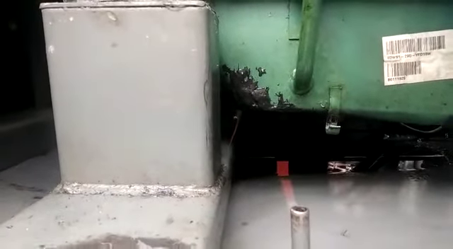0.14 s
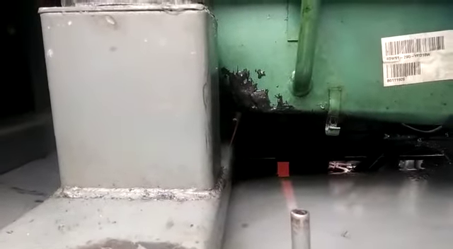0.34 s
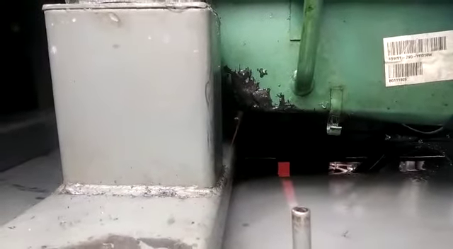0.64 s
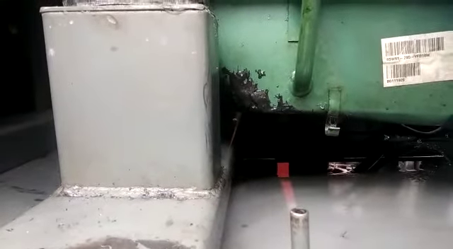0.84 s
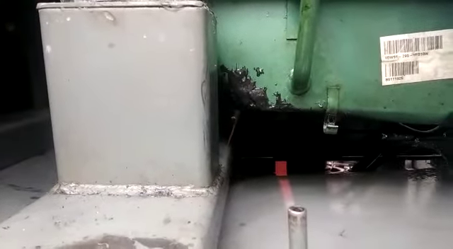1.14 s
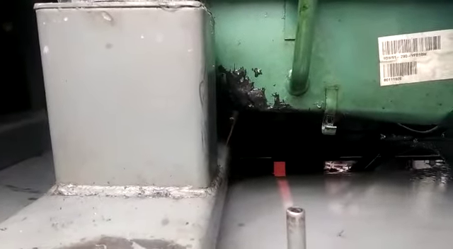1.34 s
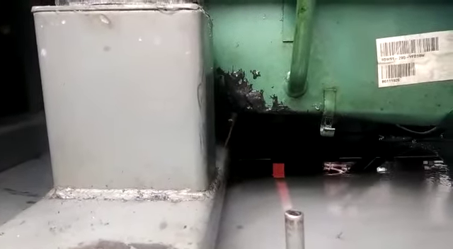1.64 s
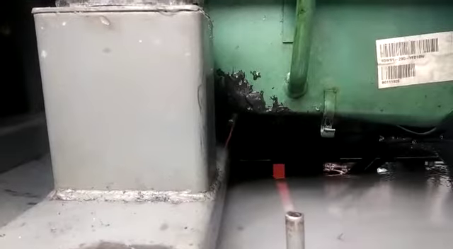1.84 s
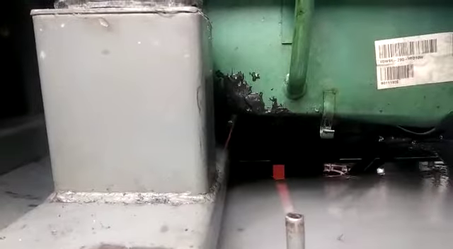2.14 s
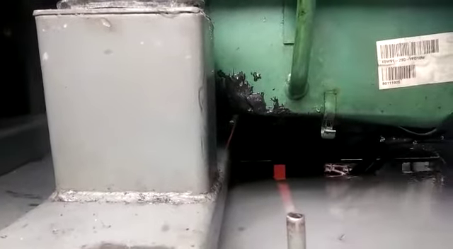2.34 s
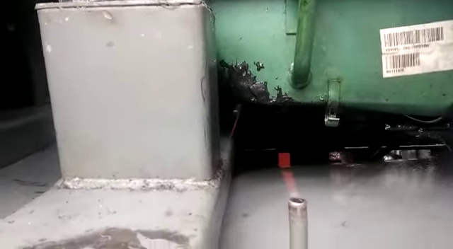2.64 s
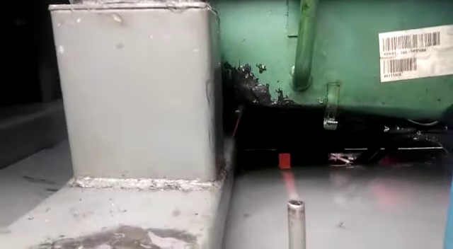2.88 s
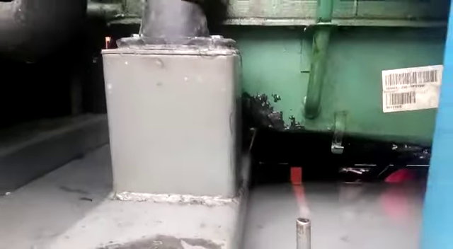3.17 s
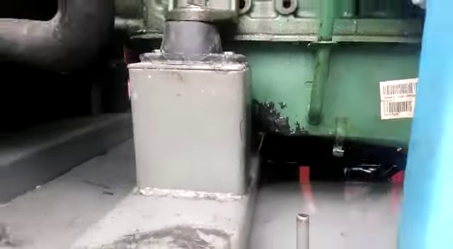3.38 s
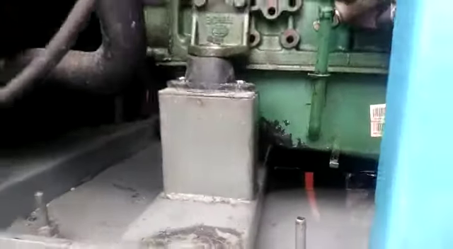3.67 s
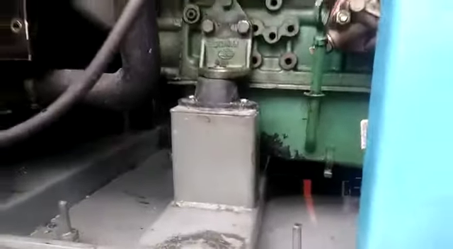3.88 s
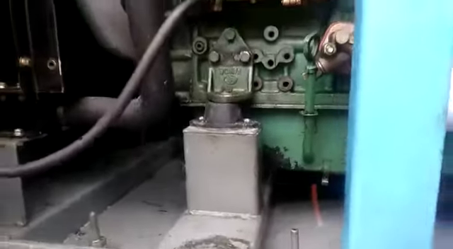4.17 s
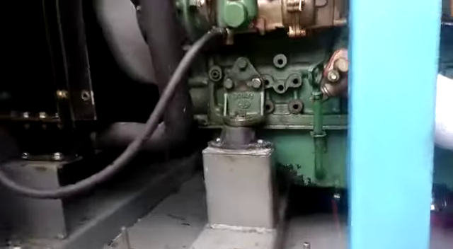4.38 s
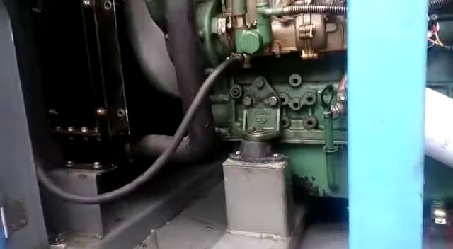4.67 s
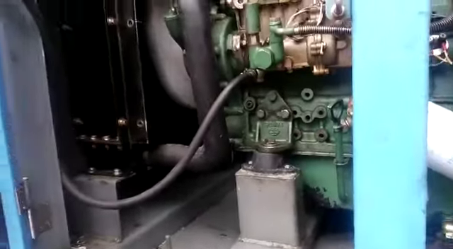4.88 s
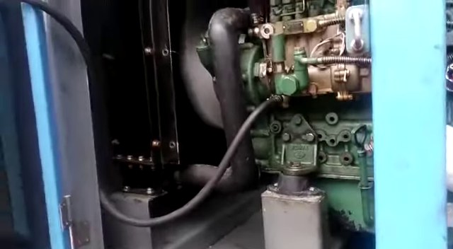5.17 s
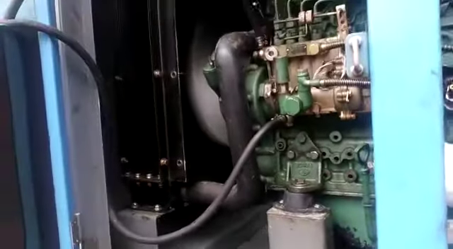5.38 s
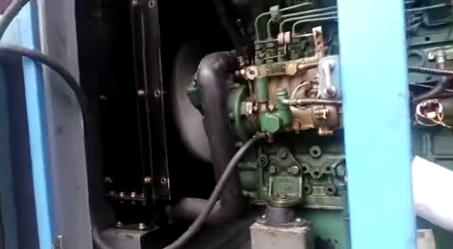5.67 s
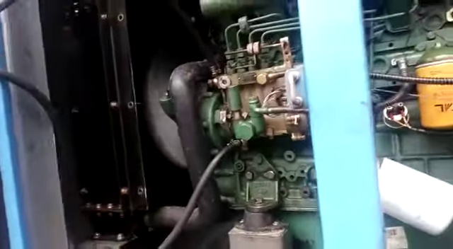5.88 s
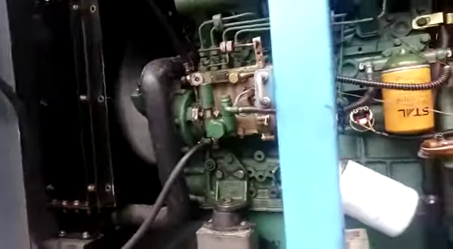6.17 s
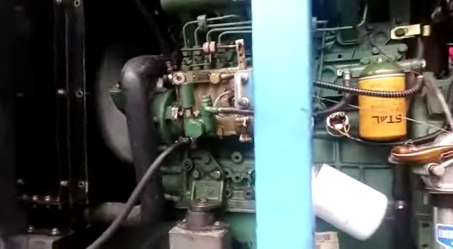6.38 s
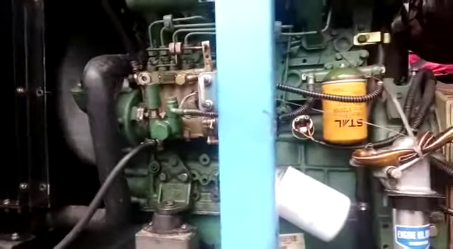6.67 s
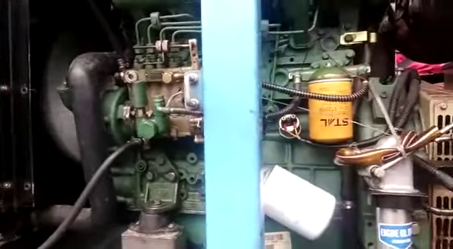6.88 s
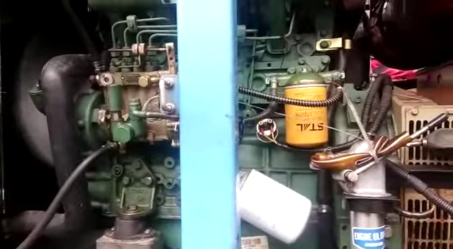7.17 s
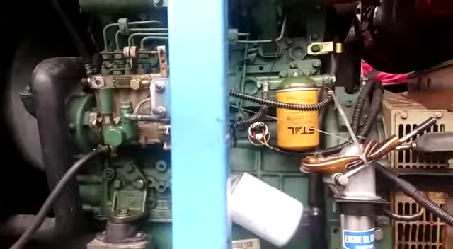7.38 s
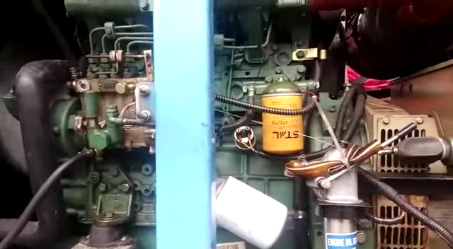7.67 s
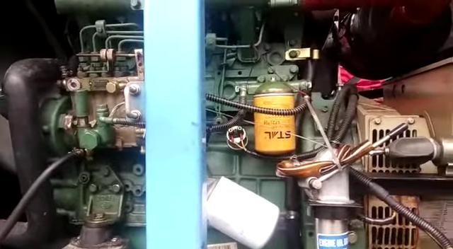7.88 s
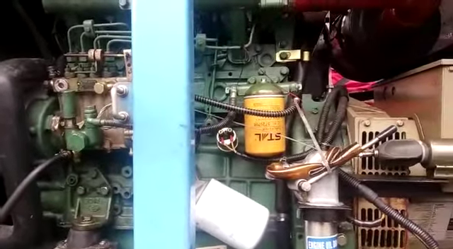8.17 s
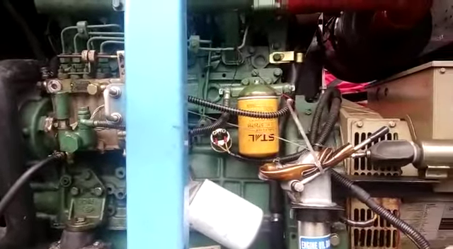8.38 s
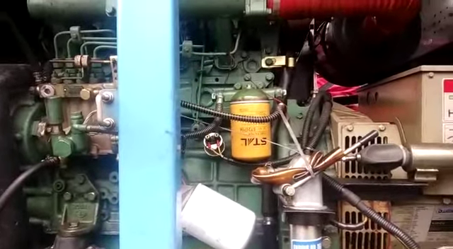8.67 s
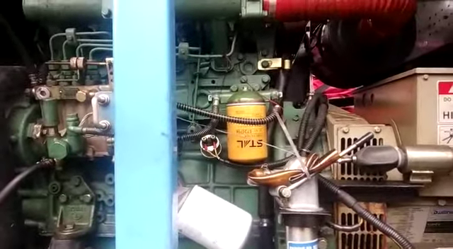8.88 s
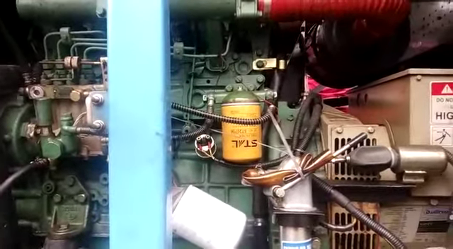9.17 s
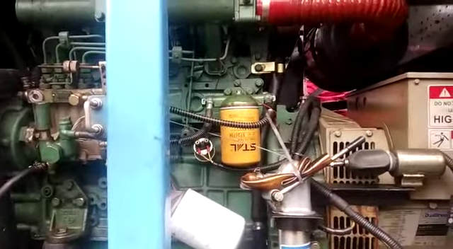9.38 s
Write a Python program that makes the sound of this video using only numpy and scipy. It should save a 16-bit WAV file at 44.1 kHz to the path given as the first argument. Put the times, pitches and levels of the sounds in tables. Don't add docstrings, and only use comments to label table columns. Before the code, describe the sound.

A four-cylinder diesel generator is already running and never changes speed. A low hum near 53 Hz and its octave sit under rapid hard knocks, about fifty-three a second, with rasping valve clatter and rushing air. A phone starts low beside the sump, then backs past the door frame from about three to six seconds; the knock thins and the clatter grows brighter.

```python
import sys
import numpy as np
from scipy import signal
from scipy.io import wavfile
from scipy.ndimage import uniform_filter1d

SR = 44100
rng = np.random.default_rng(int(sys.argv[2]) if len(sys.argv) > 2 else 0)


def volts_from_decibels(level):
    exponent = np.asarray(level, float) / 20
    return 10 ** exponent


def store_pcm(level_fs):
    pcm = np.round(np.clip(level_fs, -1, 1) * 32767).astype(np.int16)
    wavfile.write(sys.argv[1], SR, np.atleast_2d(pcm).T)


N = 420273

# time in s, distance as a share (0 by the sump, 1 standing back).
STANCE = [
    (0, 0),
    (2.6, 0.0009),
    (3.4, 0.16),
    (4.2, 0.37),
    (5.0, 0.59),
    (5.8, 0.71),
    (6.4, 0.95),
    (9.53, 1),
]
BURST_AT = .37
LEFT_RIGHT = np.array([[1], [-1]])


def in_time(rows):
    s, *columns = np.transpose(rows)
    return [np.interp(np.arange(N) / SR, s, c) for c in columns]


def at_hz(points, hz):
    f, *columns = np.transpose(points)
    return np.squeeze([np.interp(np.log(hz), np.log(f), c) for c in columns])


def drift(rate_hz):
    pole = np.exp(-80 * np.pi * rate_hz / SR)
    noise = rng.standard_normal(N // 40 + 2002)
    slow = signal.lfilter([1], [1, -2 * pole, pole * pole], noise)[2000:]
    return np.interp(np.arange(N) / 40, np.arange(len(slow)), slow / slow.std())


def blend(near, far, away):
    return near + (far - near) * away


def panned(hz, away):
    # frequency in Hz, level difference in dB; by the sump, then standing back.
    balance_near = [(60, 1.5), (110, 2), (200, 1), (380, -2.5), (700, 1.5), (1290, -2.5), (2380, 5.5),
                    (4400, 1.5), (8120, -2), (15000, -8)]
    balance_far = [(60, 1.5), (110, 1), (200, 4.5), (380, 0), (700, 1), (1290, -1.5), (2380, 7.5),
                   (4400, 0.5), (8120, -1), (15000, -10)]
    half_db = blend(at_hz(balance_near, hz), at_hz(balance_far, hz), away) / 2
    return volts_from_decibels(np.array([half_db, -half_db]))


def stereo(mid, side, hz, away):
    # frequency in Hz, correlation by the sump, correlation standing back.
    likeness = [(60, .99, .99), (110, .99, .99), (200, 0.01, 0.65), (380, 0.96, 0.94), (710, 0.72, 0.81),
                (1290, 0.43, 0.23), (2380, 0.053, 0), (15000, 0, 0.16)]
    alike = np.clip(blend(*at_hz(likeness, hz), away), 0, 1)
    return np.sqrt((1 + alike) / 2) * mid + np.sqrt((1 - alike) / 2) * side * LEFT_RIGHT


def hum(cycle, away):
    # multiple of the cycle, level by the sump in dB, level standing back in dB.
    orders = [(2, -49, -55), (3, -59, -54), (4, -15, -16), (5, -40, -43), (6, -57, -61), (7, -35, -41),
              (8, -16, -20), (9, -32.5, -35), (10, -40, -40.5), (11, -37, -34), (12, -31.5, -48.5),
              (13, -26.5, -42.5), (14, -34.5, -41.5), (15, -46, -46.5), (15.93, -30.5, -49),
              (16.92, -42, -41), (17.6, -67, -62), (18.83, -42, -59), (20.13, -47.5, -38), (21, -44, -44),
              (21.7, -46.5, -65)]
    octave_lead_rad = 1.85
    boom_order, boom_slope_rad = 10.3, 1.9
    waver_db = 0.2
    tone_db = blend(-14, -15.5, away) + waver_db * drift(1.5)
    octave_db = blend(-15, -20.0, away) + waver_db * drift(1.5)
    turn = 2 * np.pi * cycle
    out = volts_from_decibels(tone_db) * np.cos(4 * turn) * panned(53, away)
    out += volts_from_decibels(octave_db) * np.cos(8 * turn + octave_lead_rad) * panned(106, away)
    for order, near_db, far_db in orders:
        if order not in (4, 8):
            lead_rad = octave_lead_rad - boom_slope_rad * max(order - boom_order, 0)
            level = volts_from_decibels(blend(near_db, far_db, away) + .7 * drift(2.5))
            out += level * np.cos(order * turn + lead_rad) * panned(order * 13, away)
    return np.sqrt(2) * out


def knock(cycle, away, scatter=.35):
    # frequency in Hz, level by the sump in dB, level standing back in dB, t60 in s.
    modes = [(330.5, -30, -30.5, 0.15), (393, -39.5, -36, 0.12), (501.4, -29.5, -30, 0.061),
             (563, -29.5, -31, 0.097), (639.5, -25, -30.5, 0.079), (698.6, -23, -31, 0.076),
             (771.3, -26.5, -31, 0.079), (900, -29.5, -33.5, 0.068), (995, -27, -29.5, .06),
             (1052, -25.5, -31.5, 0.06), (1213, -22.5, -37, 0.049), (1294, -21, -37, 0.029),
             (1436, -28.5, -27, 0.095), (1555, -23, -26.5, 0.072), (1624, -21.5, -23, 0.079),
             (1770, -18, -32, 0.042), (2017, -27, -33.5, 0.072), (2252, -22, -21, 0.036),
             (2600, -34.5, -27.5, 0.056), (3004, -20, -18.5, 0.027), (3590, -29, -44, .03),
             (4400, -43, -57, 0.018)]
    firing = np.floor(4 * cycle - BURST_AT + .1).astype(int)
    at = np.flatnonzero(np.diff(firing)) + 1
    cylinder = firing[at] % 4
    there = away[at]
    turn = there * np.pi / 2
    out = 0
    for hz, near_db, far_db, t60_s in modes:
        near, far = rng.choice([-1, 1], (2, 2, 4)) * rng.uniform(.5, 1.5, (2, 2, 4))
        strike = np.cos(turn) * near[:, cylinder] + np.sin(turn) * far[:, cylinder]
        strike += scatter * rng.standard_normal(strike.shape)
        level = volts_from_decibels(blend(near_db, far_db, there)) * panned(hz, there)
        clicks = np.full((2, N), 1e-18)
        clicks[:, at] = stereo(*strike, hz, there) * level
        r, w = volts_from_decibels(-60 / (t60_s * SR)), 2 * np.pi * hz / SR
        out = out + signal.lfilter([0, np.sin(w)], [1, -2 * r * np.cos(w), r * r], clicks)
    return out


def bursts(cycle, sharp=1.6, scatter=.12):
    strength = [1.04, 0.81, 1.19, 1.09]
    beat = 4 * cycle - BURST_AT + .5
    firing = np.floor(beat).astype(int)
    size = np.array(strength)[firing % 4] * (1 + scatter * rng.standard_normal(N)[firing])
    swell = size * np.sin(np.pi * (beat % 1)) ** (2 * sharp)
    return swell - swell.mean()


def rush(edges, near, far, away, swell, patchy_db, treble_db=0):
    # frequency in Hz, then left near, right near, left far, right far in dB.
    depths = [(300, -2.5, 1, 4, .5), (1500, 3.5, 4.5, 1.5, 1), (4000, 3, 1.5, 3.5, 0.5),
              (7950, 6, 3, 0.5, 7), (14000, -3, 5.5, 7, 7)]
    out, together, white = 0, drift(12), rng.standard_normal((2, 2, N))
    for k, (low, high) in enumerate(zip(edges, edges[1:])):
        band = signal.butter(2, [low, high], "band", fs=SR, output="sos")
        mid, side = signal.sosfilt(band, white[k % 2])
        hz = np.sqrt(low * high)
        left_near, right_near, left_far, right_far = at_hz(depths, hz)
        depth_db = np.array([blend(left_near, left_far, away), blend(right_near, right_far, away)])
        db = blend(at_hz(near, hz), at_hz(far, hz), away)
        db = db + patchy_db * (0.21 * together + drift(11.6))
        turned_db = np.clip(np.log2(hz / 8000), 0, 1) * treble_db / 2
        level = volts_from_decibels(db + depth_db * swell + turned_db * LEFT_RIGHT)
        out = out + level * panned(hz, away) * stereo(mid, side, hz, away)
    power = np.mean(out ** 2, axis=0)
    return out / np.sqrt(blend(power[away < .1].mean(), power[away > .9].mean(), away))


def body_rush(away, swell):
    # frequency in Hz, density in dB per Hz; by the sump, then standing back.
    body_near = [(25, 0), (60, -2), (95, 6.5), (200, 9), (300, -6), (400, -1), (700, 0), (950, -1),
                 (1300, 4.5)]
    body_far = [(25, 5), (60, 4), (110, 6), (200, 3.5), (320, -4), (480, 0), (700, 3), (1000, 0.5),
                (1300, 7.5)]
    noise = rush(np.geomspace(22, 1300, 15), body_near, body_far, away, swell, patchy_db=.6)
    return volts_from_decibels(-23 + blend(0.018, -3.0, away)) * noise


def clatter(away, swell, turn_db):
    # frequency in Hz, density in dB per Hz; by the sump, then standing back.
    clatter_near = [(760, -34), (1300, -4), (1400, -12.5), (1520, -3.5), (2190, -4), (2560, -3.5),
                    (2760, -3), (2910, -4), (3940, -5.5), (5110, -6.5), (5670, -13), (6230, -7.5),
                    (8270, -9.5), (12000, -11), (15800, -15)]
    clatter_far = [(760, -39), (1300, -8.5), (1640, 1), (1720, -2.5), (2790, -1), (3400, -3), (3770, -2.5),
                   (4150, -6), (4650, -3), (5270, -6), (8090, -1), (9770, -4), (10500, -7), (11300, -5),
                   (15800, -10.5)]
    edges = np.geomspace(1300, 16500, 25)
    noise = rush(edges, clatter_near, clatter_far, away, swell, patchy_db=.6, treble_db=-turn_db)
    shade_db = -0.47 * np.sin(np.pi * away)
    return volts_from_decibels(blend(-18, -16.5, away) + shade_db + 3.0) * noise


def fan(cycle, away):
    # multiple of the blade rate, level by the sump in dB, level standing back in dB.
    harmonics = [(1, -30.5, -31.5), (2, -37.5, -37.5), (3, -36.5, -42)]
    blades_per_cycle = 17.915
    blades = 2 * np.pi * blades_per_cycle * cycle + 0.29 * drift(1.64)
    out = 0
    for k, near_db, far_db in harmonics:
        out = out + volts_from_decibels(blend(near_db, far_db, away) + 0.67 * drift(3.7)) * np.sin(k * blades)
    return np.sqrt(2) * out * panned(220, away)


def gears(cycle, away):
    # multiple of the cycle, level by the sump in dB, level standing back in dB.
    meshes = [(30, -46, -41.5), (48.07, -44.5, -42.5), (68, -54, -46.5), (75.2, -46, -38.5),
              (77, -39.5, -38), (80.6, -48, -57), (107.7, -45, -51), (120.4, -55, -39.5)]
    out = 0
    for order, near_db, far_db in meshes:
        level = volts_from_decibels(blend(near_db, far_db, away) + .8 * drift(3.5))
        phase = 2 * np.pi * order * cycle + .25 * drift(2.5)
        out = out + level * np.sin(phase) * panned(order * 13, away)
    return np.sqrt(2) * out


def door_frame(x, away):
    band = signal.sosfilt(signal.butter(1, [300, 2000], "band", fs=SR, output="sos"), x)
    late = np.arange(N) - blend(.0025, .0017, away) * SR
    share = .7 * np.sin(np.pi * away ** 0.71) ** 2
    return share * np.array([np.interp(late, np.arange(N), v) for v in band])


def thin_out(x):
    # frequency in Hz, threshold in dB against the broad spectrum.
    drops = [(1500, -25), (2500, -6.5), (3500, -1.5), (5500, 0), (7400, -1), (10000, -.5), (12000, -3),
             (15500, -3)]
    # centre in Hz, width in Hz, added threshold by the sump and standing back in dB.
    hollows = [(4150, 130, 0, 6), (5450, 200, 4, 5), (6250, 130, 1, 5), (8500, 250, 3, 1),
               (10400, 250, 2, 4)]
    patch_db = 5.0

    def broad(v):
        power = uniform_filter1d(np.abs(v) ** 2, size=5, axis=2)
        return np.sqrt(np.abs(uniform_filter1d(power, size=91, axis=1)) + 1e-16)

    mid_side = np.array([x[0] + x[1], x[0] - x[1]]) / 2
    hz, s, lines = signal.stft(mid_side, SR, window="cosine", nperseg=2048)
    chance = rng.standard_normal(lines.shape) * .6 + rng.standard_normal(lines.shape[1:]) * .8
    patch = uniform_filter1d(uniform_filter1d(chance, size=11, axis=1), size=2, axis=2)
    level, away = broad(lines), np.interp(s, *np.transpose(STANCE))
    threshold_db = at_hz(drops, hz + 1)[:, None] + patch_db * patch / patch.std()
    for mid_hz, wide_hz, near_db, far_db in hollows:
        shape = np.exp(-((hz - mid_hz) / wide_hz) ** 2)
        threshold_db = threshold_db + np.outer(shape, blend(near_db, far_db, away))
    kept = lines * (np.abs(lines) > level * volts_from_decibels(threshold_db))
    kept = kept * np.minimum(level / broad(kept), 2)
    mid, side = signal.istft(kept, SR, window="cosine", nperseg=2048)[1][:, :N]
    return np.array([mid + side, mid - side])


def scene():
    # time in s, four-stroke cycles per s.
    speed = [(0, 13.232), (.55, 13.234), (1.05, 13.22), (1.55, 13.238), (2.05, 13.21), (2.55, 13.208),
             (3.05, 13.227), (3.55, 13.217), (4.05, 13.194), (4.55, 13.214), (5.05, 13.222), (5.55, 13.24),
             (6.05, 13.221), (6.55, 13.23), (7.05, 13.205), (7.55, 13.205), (8.05, 13.223), (9.53, 13.223)]
    # time in s, lean of the top octave to the right in dB.
    hand_turn = [
        (0, -1),
        (3.2, -1.5),
        (4.7, -1.5),
        (5.1, 4),
        (6.2, 3),
        (7.2, 3.5),
        (8.6, 1.5),
        (9.53, 1),
    ]
    cycle = .0715 + np.cumsum(in_time(speed)[0]) / SR
    away = np.clip(in_time(STANCE)[0], 0, 1)
    turn_db, swell = in_time(hand_turn)[0], bursts(cycle)
    sway = volts_from_decibels(0.25 * drift(0.79))
    bass_lean_db = 0.37 * turn_db / 2
    out = hum(cycle, away) * volts_from_decibels(bass_lean_db * LEFT_RIGHT)
    block = sway * (volts_from_decibels(-2.5) * knock(cycle, away) + body_rush(away, swell))
    out += block + door_frame(block, away)
    out += sway * clatter(away, swell, turn_db)
    out += fan(cycle, away) + gears(cycle, away)
    left_lag_s = .00015 * (1 - away)
    late = np.arange(N) - np.round(left_lag_s * SR).astype(int)
    return np.array([out[0, np.clip(late, 0, N - 1)], out[1]])


def top_cut(x):
    return signal.sosfilt(signal.butter(12, 16950, fs=SR, output="sos"), x)


def record(dry):
    low_pass = signal.ellip(12, .5, 80, 15780, fs=SR, output="sos")
    cut = signal.sosfilt(low_pass, np.clip(dry, -.9, .9))
    return top_cut(thin_out(cut))


dry = scene()
out = record(dry)
store_pcm(out)
```